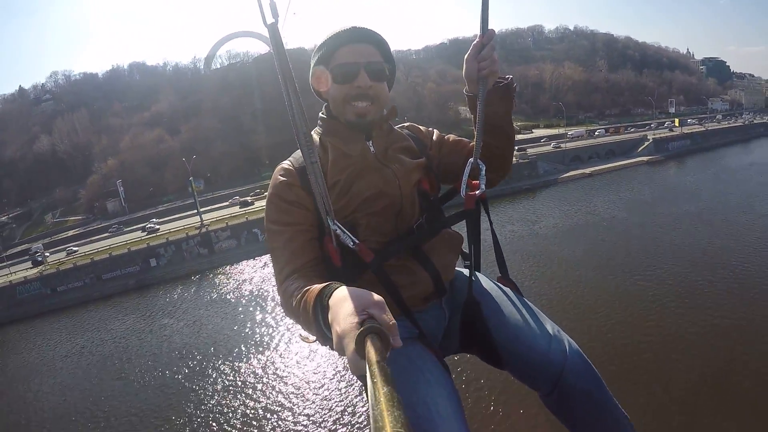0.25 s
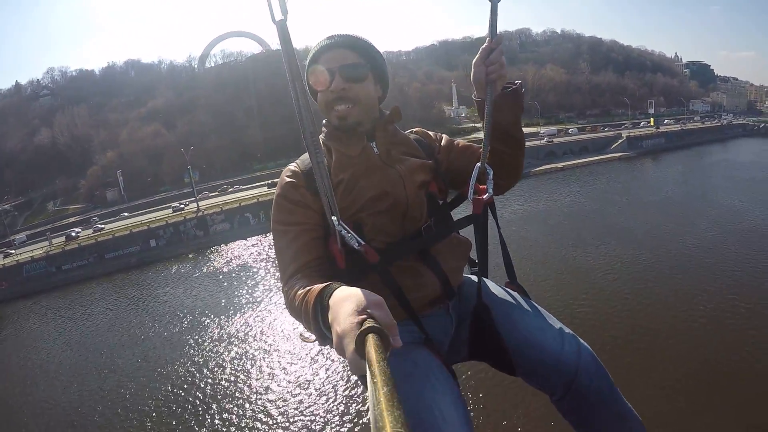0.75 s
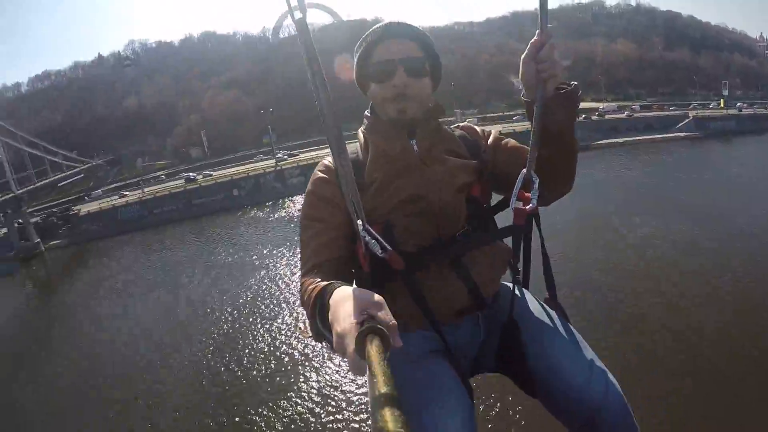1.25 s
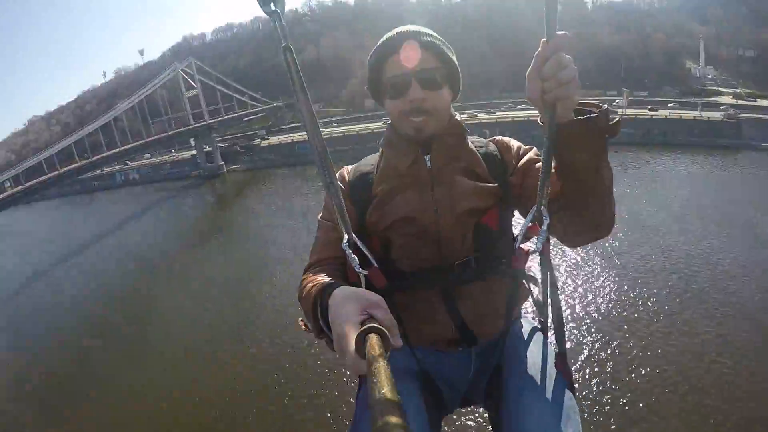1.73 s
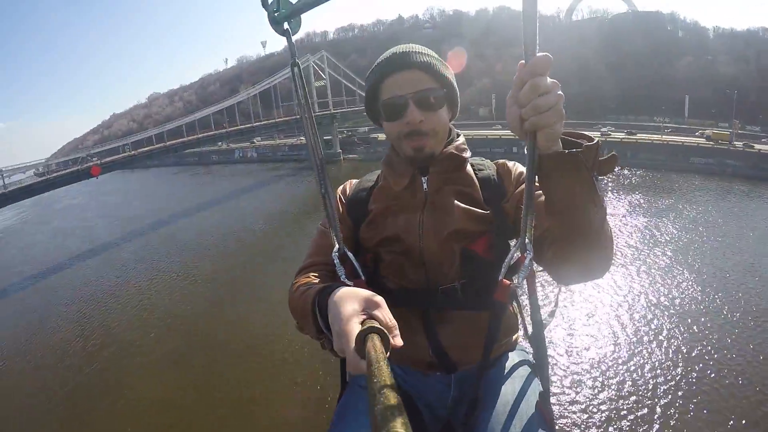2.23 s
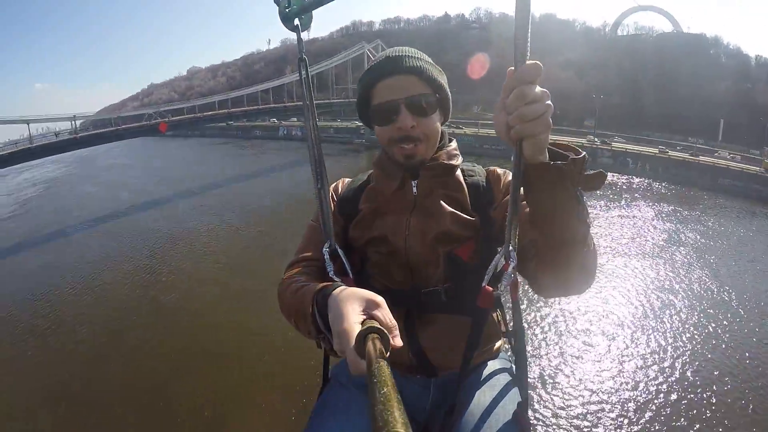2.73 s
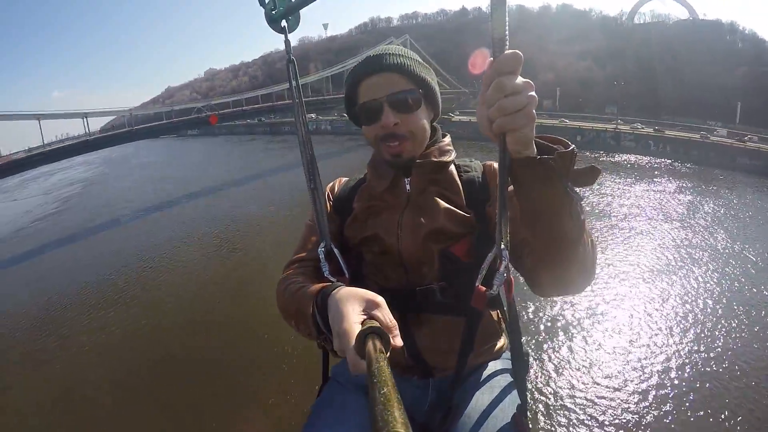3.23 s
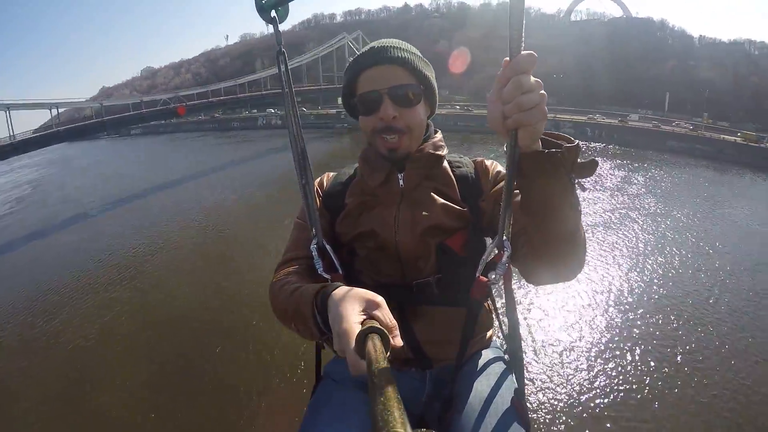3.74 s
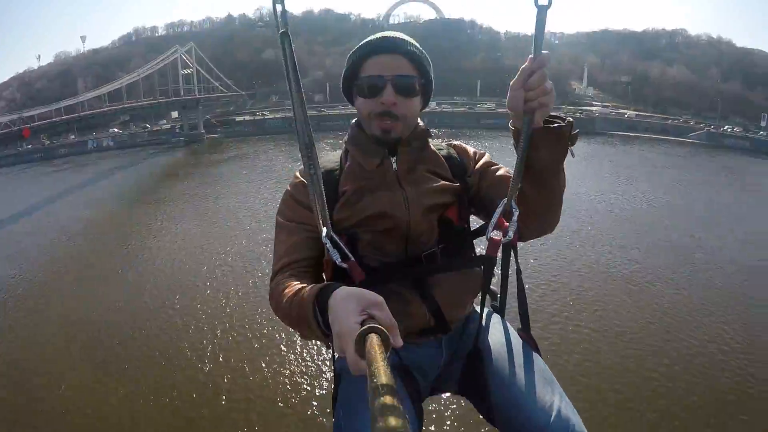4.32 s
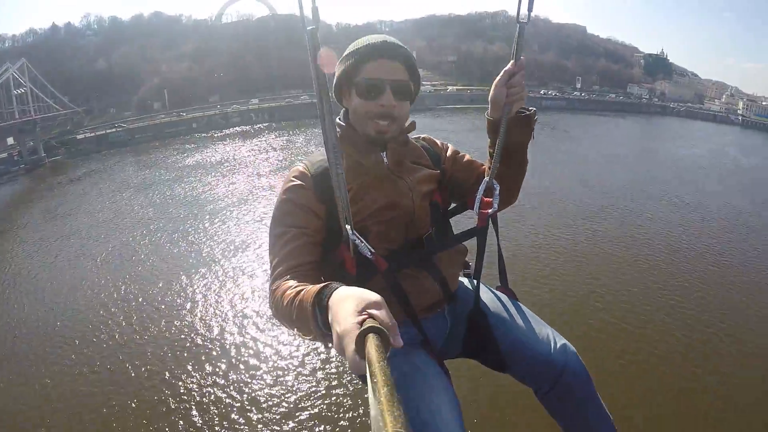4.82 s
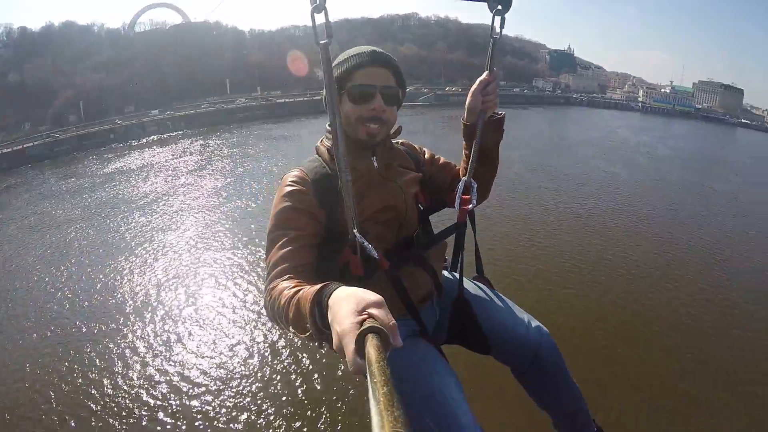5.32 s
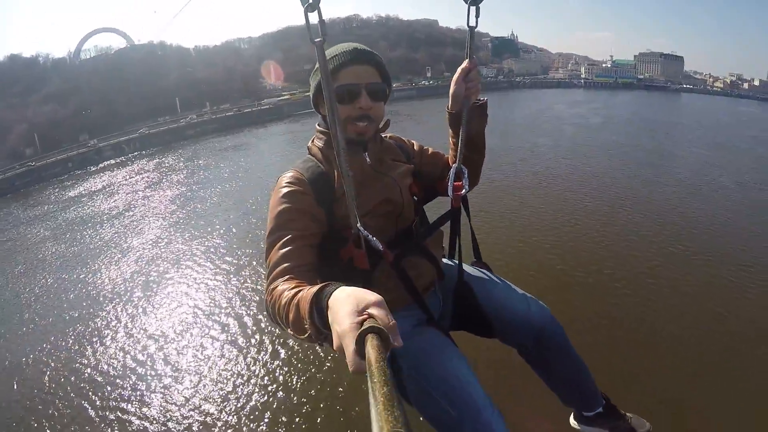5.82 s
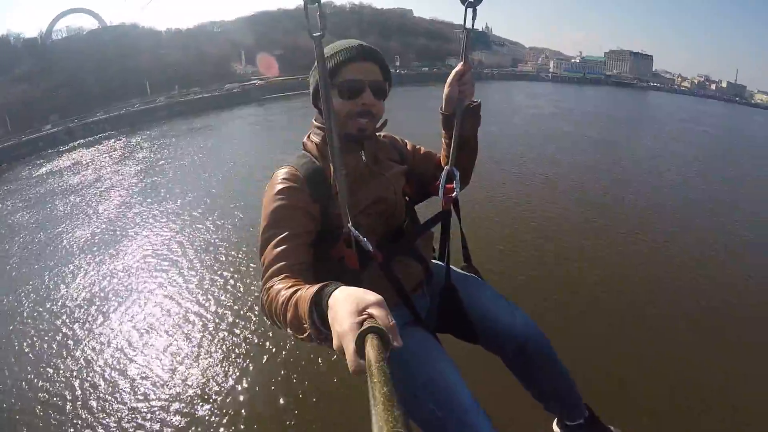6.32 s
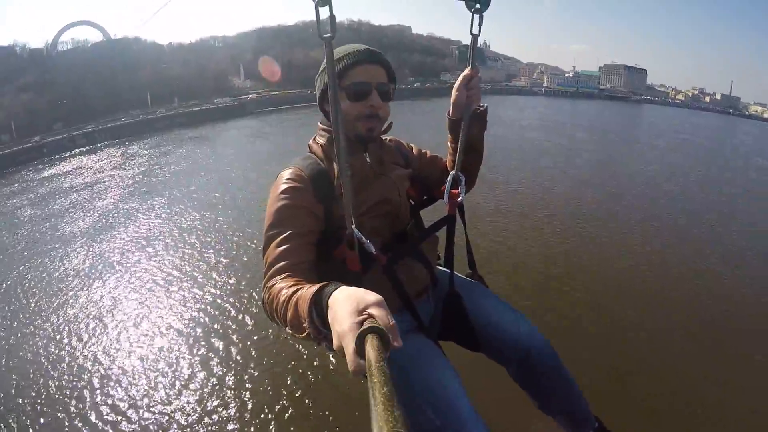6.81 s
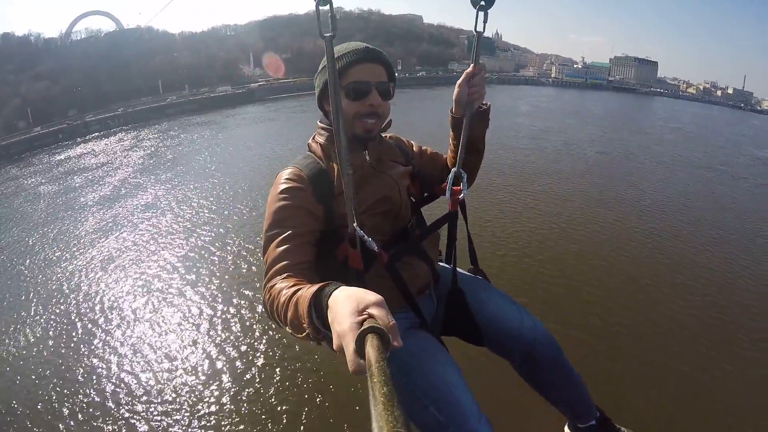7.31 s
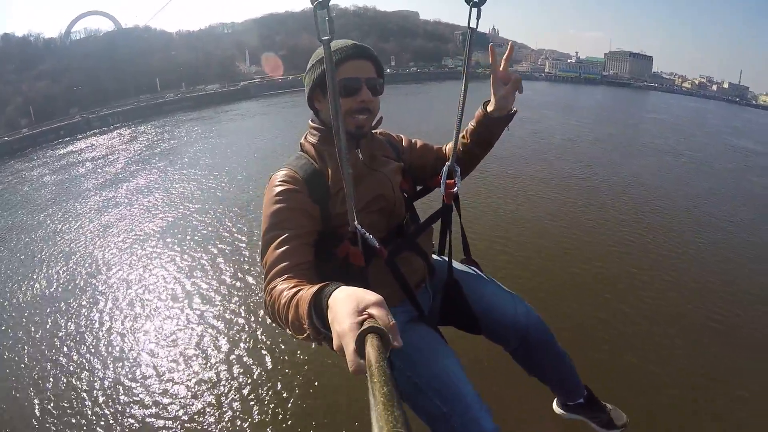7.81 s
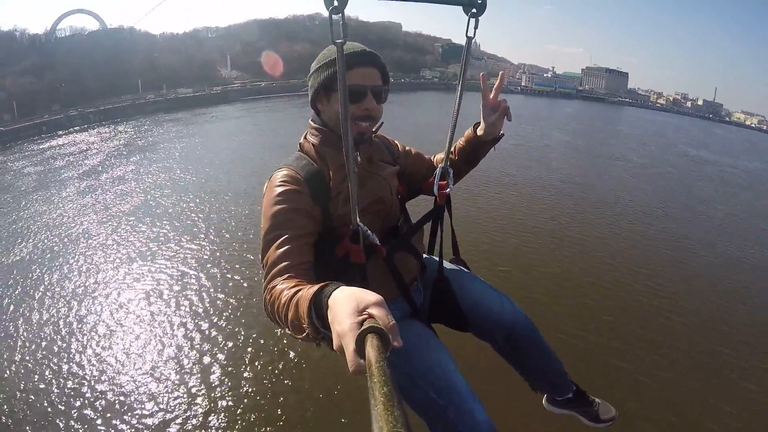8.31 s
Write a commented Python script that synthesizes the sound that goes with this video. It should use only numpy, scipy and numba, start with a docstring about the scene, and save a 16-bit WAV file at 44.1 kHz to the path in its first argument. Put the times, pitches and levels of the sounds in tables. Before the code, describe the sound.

Pulleys whir along a steel cable, ringing high and slowly falling in pitch, squealing now and then, while wind rumbles and hums on the microphone.

```python
"""A zip line trolley runs down a steel cable, heard from a camera on a stick held by the rider.
Cable strands tick under the pulleys as a slowly falling whine; rolling noise rings the trolley near 4 kHz.
Now and then a pulley whistles or squeals. The rider swings round and back, which changes the colour.
Wind buffets the microphone as low noise and hums as the stick sheds vortices.
The camera turns its gain down under the loudest moments."""
import sys
import numpy as np
from scipy import signal
from scipy.fft import rfft, irfft, next_fast_len
from scipy.io import wavfile
from scipy.ndimage import uniform_filter1d
from numba import njit

SR = 44100
rng = np.random.default_rng(int(sys.argv[2]) if len(sys.argv) > 2 else 0)


def waveform_to_disk(signal):
    """Save audio, clipped to [-1, 1], as 16-bit WAV at the path in sys.argv[1]."""
    frames = np.transpose(np.atleast_2d(signal))
    scaled = np.clip(frames, -1, 1) * 32767
    samples = np.round(scaled).astype(np.int16)
    wavfile.write(sys.argv[1], SR, samples)


N = 377055
T = np.arange(N) / SR  # time in seconds

# Which way the rider faces. Each row: time in seconds, turn (-1 one side, 0 middle, 1 the other side).
RIDER_TURN = [(0, -.085), (1, -.05), (1.55, .02), (2.05, .71), (2.6, 1), (3.75, .96), (4.25, .14),
              (4.6, -.05), (4.9, -.33), (5.3, -1.2), (6, -.88), (8.55, -2.24)]
# How strongly the ring reaches the microphone. Each row: turn, level in dB before each sound's own trim.
# The rows are not sorted by turn; keep their order.
RING_BY_TURN = [(-0.5, -19), (-1, -20.3), (-0.58, -18.6), (-0.24, -22.3), (0.16, -22.3), (-0.05, -33.5),
                (0.31, -25.5), (0.85, -19.7), (1.5, -21.2)]


def undb(db):
    """Decibels to gain."""
    return 10 ** (np.asarray(db) / 20)


def curves(table):
    """Each column of a table of timed rows, joined by straight lines."""
    seconds, *columns = np.transpose(table)
    return [np.interp(T, seconds, column) for column in columns]


def facing(table):
    """A quantity that depends on which way the rider faces, over time."""
    turn, = curves(RIDER_TURN)
    return np.interp(turn, *np.transpose(table))


def walk(rate):
    """Smooth random curve of spread 1 that changes roughly rate times a second."""
    seconds = np.linspace(0, N / SR, num=4096)
    f = np.arange(len(seconds) // 2 + 1) / seconds[-1]
    spectrum = rfft(rng.standard_normal(len(seconds))) * np.exp(-(f / rate) ** 2)
    curve = irfft(spectrum)
    return np.interp(T, seconds, curve / np.std(curve))


def shaped(x, response):
    """A signal coloured by response(Hz)."""
    size = next_fast_len(N)
    f = np.maximum(np.arange(size // 2 + 1) * SR / size, 1)
    return irfft(rfft(x, size) * response(f), size)[:N]


def noise(response, drive=0):
    """Noise, plus any other drive, coloured by response(Hz); rms 1."""
    x = shaped(rng.standard_normal(N) + drive, response)
    return x / np.std(x)


def resonance(f, hz, width):
    """Gain of one resonance, 1 at its centre."""
    return 1 / np.sqrt(1 + ((f ** 2 - hz ** 2) / (f * width)) ** 2)


def mode_group(f, hz, width):
    """Gain of closely packed modes: a flat top with steep sides."""
    return 1 / np.sqrt(1 + ((f ** 2 - hz ** 2) / (f * width)) ** 4)


def phase_of(hz):
    """Running phase in radians of a moving frequency."""
    return 2 * np.pi * np.cumsum(hz) / SR


def strand_rate(start_hz=226, loss_hz=.975, loss_power=1.62):
    """Strands a second under the pulley: the trolley slows ever more as the cable levels out."""
    return start_hz - loss_hz * T ** loss_power


def strand_phase(wobble=.0016, drift=.0012):
    """One full cycle for each strand that passes under the pulley; the speed is never quite even."""
    unevenness = wobble * walk(47.7) + drift * walk(2.008)
    return phase_of(strand_rate() * (1 + unevenness))


def overtone(phase, multiple, shimmer=0.35):
    """One overtone of the strand rate; no two strands are alike, which roughens the line."""
    angle = multiple * phase + rng.uniform(0, 2 * np.pi)
    steady = (1 + shimmer * walk(26)) * np.sin(angle)
    return np.sqrt(2) * (steady + shimmer * walk(24) * np.cos(angle))


def rolling(phase, ripple_db=-29.0206, ripple_swell_db=3, flutter_db=0.63, own_db=0.87, trim_db=-1.12):
    """Rough contact and strand ripple drive the broad resonances; each radiates differently as the rider turns."""
    # Broad resonances of trolley and cable. Each row: centre in Hz, width in Hz,
    # then level in dB at turn -1, at turn 0 and at turn 1, before rolling strength and trim.
    broad_modes = [(500.0, 270.0, -48.6, -45.2, -47.8), (770.0, 200.0, -38.2, -37.5, -40.4),
                   (1300.0, 620.0, -39.1, -38.0, -37.8), (1740.0, 310.0, -45.5, -42.2, -45.4),
                   (2380.0, 620.0, -40.0, -37.3, -33.1), (2780.0, 400.0, -48.5, -39.3, -45.2),
                   (3230.0, 390.0, -36.9, -36.3, -34.6), (3610.0, 290.0, -36.1, -35.6, -33.0),
                   (3860.0, 150.0, -47.1, -37.3, -38.9), (4260.0, 250.0, -25.4, -28.1, -30.4),
                   (4470.0, 260.0, -33.9, -32.2, -34.0), (5110.0, 370.0, -39.4, -37.1, -42.0),
                   (5610.0, 900.0, -43.2, -37.2, -30.5), (6210.0, 330.0, -32.9, -36.6, -29.3),
                   (6630.0, 380.0, -32.2, -31.4, -29.2), (7050.0, 320.0, -54.8, -34.0, -30.6),
                   (7480.0, 380.0, -47.7, -39.6, -55.2), (7860.0, 410.0, -41.5, -38.1, -35.3),
                   (8710.0, 440.0, -41.8, -38.4, -38.1), (9470.0, 600.0, -43.5, -39.6, -37.0),
                   (9780.0, 290.0, -47.7, -37.2, -43.9), (10420.0, 990.0, -40.9, -41.4, -37.6),
                   (11130.0, 620.0, -44.6, -33.0, -48.2), (11820.0, 920.0, -50.3, -35.5, -41.6),
                   (12830.0, 830.0, -38.7, -36.7, -36.9), (13720.0, 620.0, -49.9, -42.1, -39.9),
                   (14590.0, 760.0, -44.0, -40.9, -42.0)]
    # How hard the pulleys run on the cable. Each row: time in seconds,
    # boost of the low resonances in dB, boost of the high resonances in dB.
    rolling_strength = [(0, 1.5, 1.3), (.7, 0, 0.5), (1.3, 2.1, 1.8), (1.97, 4, 1.76), (2.3, 0.5, 1),
                        (3.4, 1.3, 1), (4.05, 3.5, 0.8), (4.4, -0.2, 1.5), (5, 2.9, 2.8), (5.8, -1, 2),
                        (6.7, 1.1, 1), (7.3, 4, 1.5), (8.55, -0.9, -.2)]

    turn, = curves(RIDER_TURN)
    body_db, hiss_db = curves(rolling_strength)
    ripple = np.zeros(N)
    for k in range(11, 38):  # multiples of the strand rate
        strength = undb(ripple_db + ripple_swell_db * walk(2.0))
        ripple += strength * np.sin(k * phase + rng.uniform(0, 2 * np.pi))
    contact_db = flutter_db * walk(40)  # shared by all resonances
    out = np.zeros(N)
    for hz, width, *facing_db in broad_modes:
        treble = np.interp(hz, [2000, 5500], [0, 1])  # 0 is a low resonance, 1 a high one
        strength_db = (1 - treble) * body_db + treble * hiss_db
        db = np.interp(turn, [-1, 0, 1], facing_db) + strength_db
        tone = noise(lambda f: mode_group(f, hz, width), ripple)
        out += undb(db + contact_db + own_db * walk(7.4)) * tone
    return out * undb(trim_db)


def pulley_ring(hz=4112, width=88, skirt_width=360, throb_db=0.65, swell_db=1.2, trim_db=0.8):
    """The pulley's sharpest mode, shaken at random by the cable: a shrill, fluttering ring."""
    ring = noise(lambda f: resonance(f, hz, width) * resonance(f, hz, skirt_width))
    # slow level changes are evened out, so the ring flutters fast while its loudness follows the rider's turn
    power = uniform_filter1d(ring ** 2, size=2800)
    db = facing(RING_BY_TURN) + trim_db + throb_db * walk(28) + swell_db * walk(7.8)
    return ring / np.sqrt(power) * undb(db)


def whine(phase, swell_db=2, waver_db=0.8, trim_db=-1):
    """Overtones of the strand rate glide down as the trolley slows; each sings out while it crosses a resonance."""
    # Sharp resonances that make a passing overtone sing.
    # Each row: centre in Hz, width in Hz, level in dB added to the level of RING_BY_TURN before the trim.
    sharp_modes = [(3520, 330, -20), (4105, 100, -3), (4290, 130, -9)]

    f = np.linspace(2000, 6000, num=800)
    power = sum((undb(db) * mode_group(f, hz, width)) ** 2 for hz, width, db in sharp_modes)
    gain = np.sqrt(power)
    strand_hz, out = strand_rate(), np.zeros(N)
    for k in range(13, 24):  # multiples of the strand rate
        resonance_gain = np.interp(k * strand_hz, f, gain)
        unsteady = undb(swell_db * walk(2.5) + waver_db * walk(7.8))
        out += resonance_gain * unsteady * overtone(phase, k)
    return out * undb(facing(RING_BY_TURN) + trim_db)


def squeals(phase, fade_s=.04, fade_share=.25, waver_db=.8, trim_db=-.5):
    """Now and then the pulley locks onto one overtone, holds it unsteadily and lets go; long whistles fade slowly."""
    # From thin whistles to loud squeals. Each row: start in seconds, end in seconds (both half-way
    # through a fade), multiple of the strand rate, level in dB before the trim.
    squeal_rows = [(0, 1.1, 16, -35), (.1, 1.7, 13, -44), (.58, .92, 18, -22), (.95, 1.35, 24, -38.5),
                   (.95, 2.1, 12, -37.5), (1.65, 2.02, 24, -31.5), (1.65, 2.05, 27, -37),
                   (1.92, 2.08, 7, -39), (2.04, 2.09, 19, -20), (2.25, 2.65, 12, -34), (2.8, 4.3, 7, -44),
                   (2.3, 3.2, 32, -34), (3.07, 3.6, 24, -36), (3.5, 4.1, 36, -36), (3.6, 4.4, 24, -32),
                   (4.4, 5.3, 29, -36.5), (4.55, 5.3, 12, -39), (4.85, 5.15, 24, -35), (5.1, 5.8, 21, -27),
                   (5.8, 6.01, 21, -20.5), (5.8, 6.01, 17, -30.5), (6, 6.5, 24, -37), (6.4, 8.4, 12, -48),
                   (8.11, 8.17, 21, -13.5), (8.32, 8.65, 21, -12.5)]

    out = np.zeros(N)
    for start, end, multiple, db in squeal_rows:
        fade = fade_s + fade_share * (end - start)
        inside = np.minimum(T - start, end - T)  # seconds to the nearer edge
        held = np.clip(inside / fade + .5, 0, 1)
        out += undb(db + waver_db * walk(8.4)) * held * overtone(phase, multiple, shimmer=.33)
    return out * undb(trim_db)


def treble_beam(hz=11450, width=1000, aim=0.13, spread=0.18, level_db=-35):
    """High hiss leaves the trolley in a narrow beam, which the microphone crosses as the rider turns."""
    turn, = curves(RIDER_TURN)
    beam = np.exp(-((turn - aim) / spread) ** 2 / 2)
    return undb(level_db) * beam * noise(lambda f: mode_group(f, hz, width))


def vortex_hum(base_db=-35.5, wander=0.016, turbulence=0.52):
    """Vortex shedding: an unsteady low hum whose pitch depends on how the stick meets the air."""
    # Each row: turn, middle pitch in Hz. The rows are not all sorted by turn; keep their order.
    pitch_by_turn = [(-2, 130), (-1.62, 139), (0, 138), (.1, 128), (0.23, 180), (1.03, 190), (.97, 200)]
    # Gusts that swell the hum. Each row: middle in seconds, half length in seconds,
    # level in dB, added as power to the base level.
    hum_swells = [(1.53, .13, -27), (2.98, 0.12, -24.5), (3.48, 0.21, -21.7), (3.95, .1, -29),
                  (4.393, 0.075, -25.8), (5.65, .2, -30), (6.447, 0.27, -25.5), (7.3, 0.4, -27),
                  (8.3, 0.33, -29.5)]

    power = undb(base_db) ** 2
    for middle, half, db in hum_swells:
        power = power + undb(db) ** 2 * np.exp(-((T - middle) / half) ** 2)
    phase = phase_of(facing(pitch_by_turn) * (1 + wander * walk(13.4)))
    hum = (1 + turbulence * walk(24.6)) * np.sin(phase) + turbulence * walk(27.0) * np.cos(phase)
    return hum * np.sqrt(power)


def buffeting(gust_db=.8, trim_db=.6):
    """Eddies thump on the microphone port; slow swells are evened out so the level follows wind_level and gusts."""
    # Air on the microphone. Each row: time in seconds, level in dB before gusts and trim.
    wind_level = [(0.05, -26), (1.29, -30), (1.51, -26), (3.68, -22), (4.49, -26.5), (7.77, -25.5),
                  (7.9, -25)]
    # Tone colour of the wind. Each row: frequency in Hz, relative level in dB.
    wind_spectrum = [(10, -36), (20, -25), (33, -3.5), (54, -1), (76, -7), (96, -4), (125, -13), (165, -19),
                     (210, -16.5), (250, -26.5), (320, -33.5), (600, -54), (2000, -70)]

    wind_db, = curves(wind_level)
    hz, db = np.transpose(wind_spectrum)
    rumble = noise(lambda f: undb(np.interp(np.log(f), np.log(hz), db)))
    power = uniform_filter1d(rumble ** 2, size=11000)  # average over a quarter of a second
    return rumble / np.sqrt(power) * undb(wind_db + trim_db + gust_db * walk(4.7))


def scene():
    """Trolley overhead and wind at the microphone, in open air with no echo."""
    phase = strand_phase()
    beams = treble_beam() + treble_beam(hz=6740, width=1000, aim=-0.42, spread=0.19, level_db=-30)
    trolley = rolling(phase) + beams + pulley_ring() + whine(phase) + squeals(phase)
    return (trolley + buffeting() + vortex_hum())[None]


@njit
def follow(size, attack, release):
    """An envelope that rises fast and falls slowly."""
    out, e = np.empty(len(size)), 0.
    for i in range(len(size)):
        e += (size[i] - e) * (attack if size[i] > e else release)
        out[i] = e
    return out


def record(dry, limit_db=-9.5, attack_s=0.0039, release_s=.25, drive=.6, top_hz=15200):
    """The camera turns its gain down when the sound is loud, rounds the highest peaks and cuts the top."""
    envelope = follow(np.abs(dry[0]), 1 / (attack_s * SR), 1 / (release_s * SR))
    held = dry / np.maximum(envelope / undb(limit_db), 1)
    rounded = np.tanh(drive * held) / drive
    top_cut = signal.ellip(12, .2, 80, top_hz, fs=SR, output="sos")
    return signal.sosfilt(top_cut, rounded)


dry = scene()
out = record(dry)
waveform_to_disk(out)
```